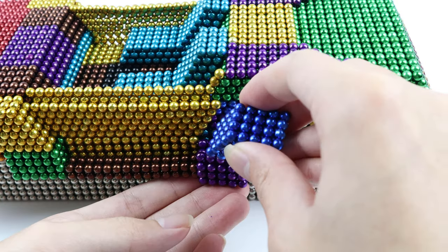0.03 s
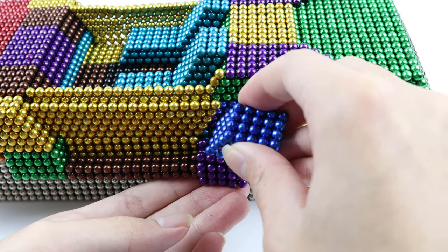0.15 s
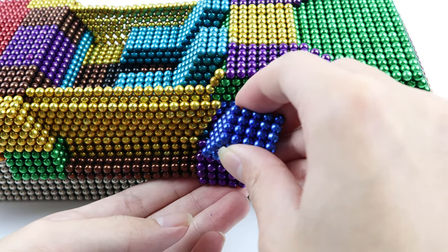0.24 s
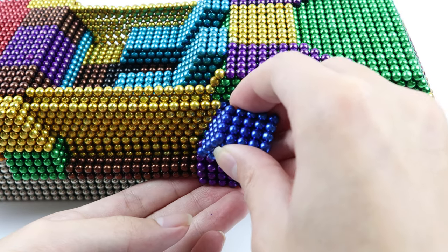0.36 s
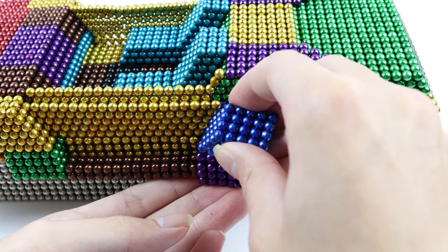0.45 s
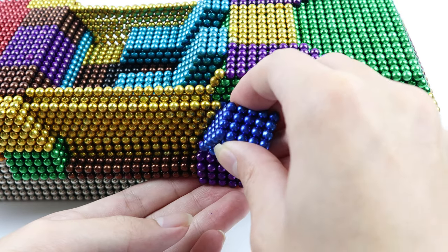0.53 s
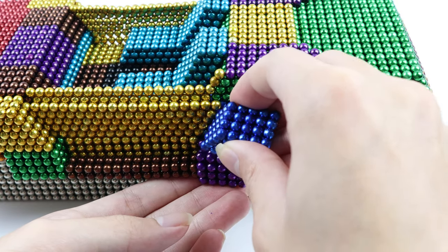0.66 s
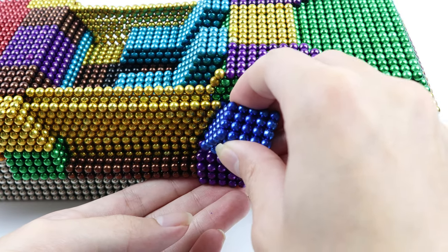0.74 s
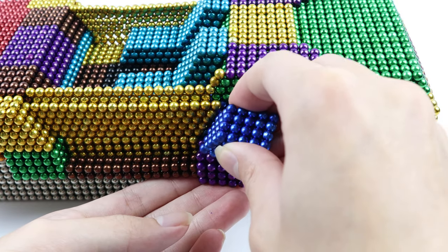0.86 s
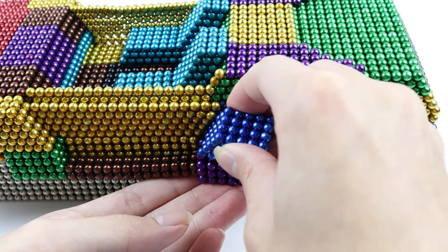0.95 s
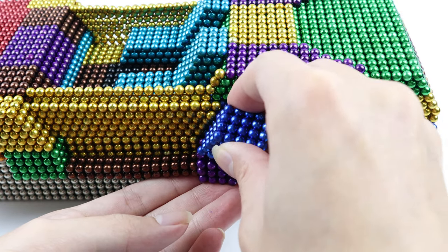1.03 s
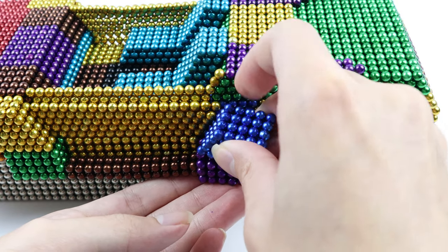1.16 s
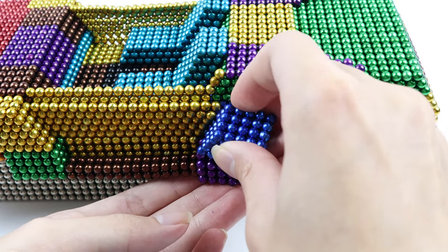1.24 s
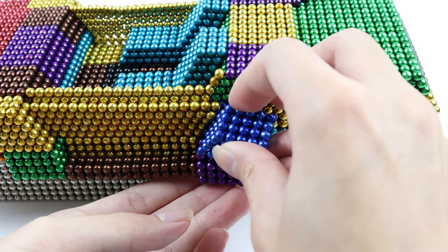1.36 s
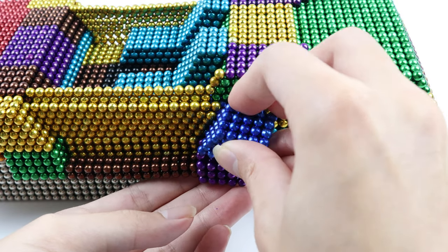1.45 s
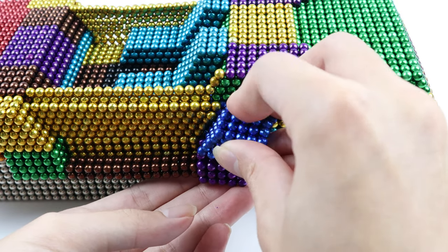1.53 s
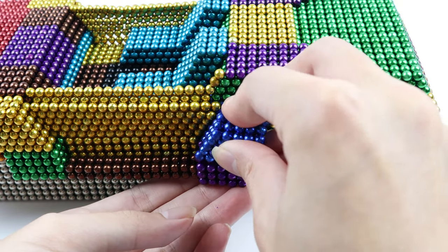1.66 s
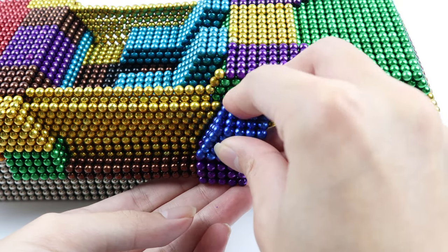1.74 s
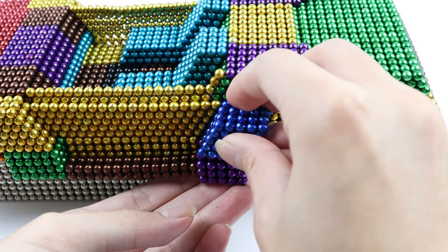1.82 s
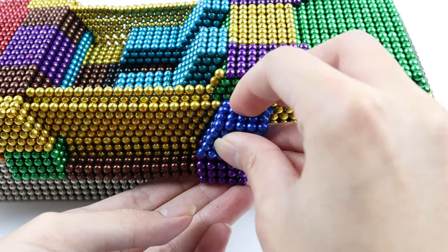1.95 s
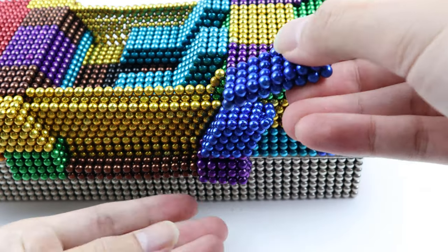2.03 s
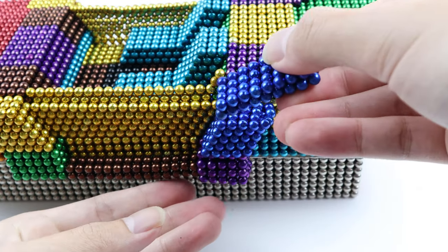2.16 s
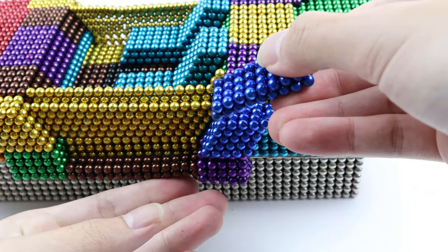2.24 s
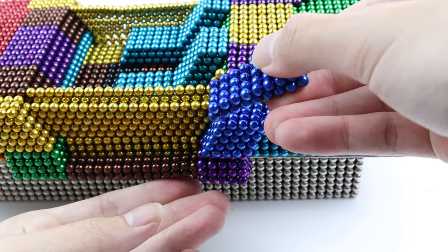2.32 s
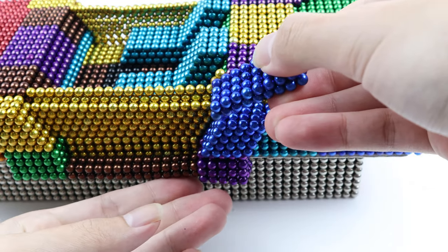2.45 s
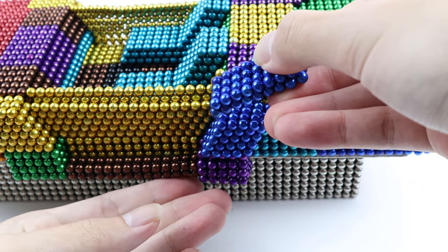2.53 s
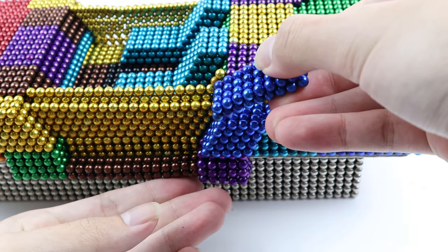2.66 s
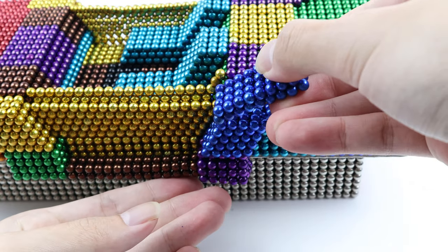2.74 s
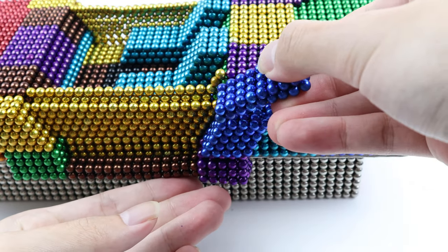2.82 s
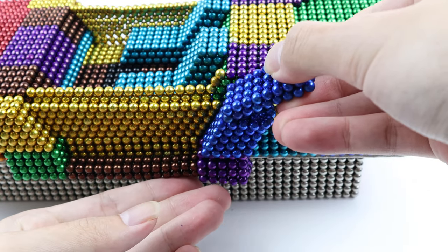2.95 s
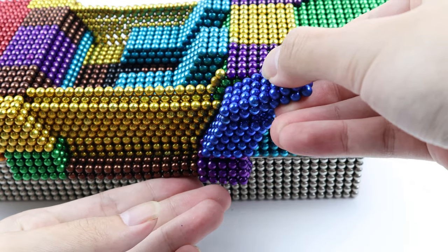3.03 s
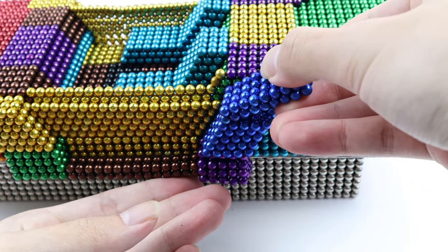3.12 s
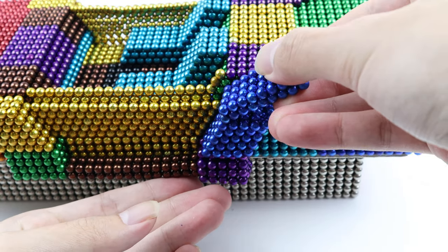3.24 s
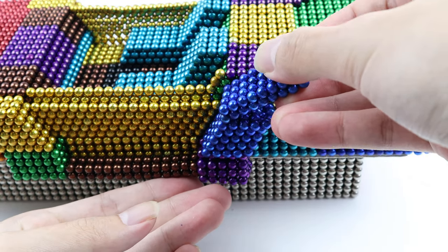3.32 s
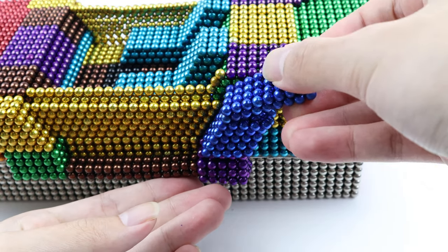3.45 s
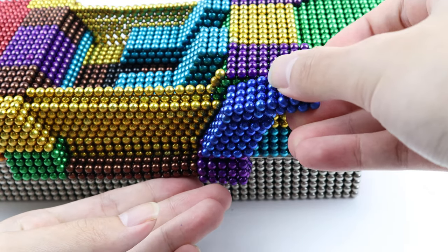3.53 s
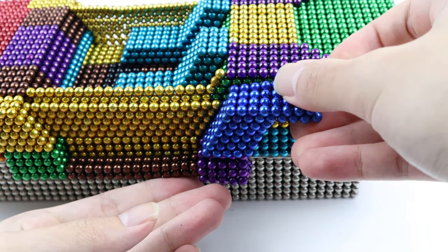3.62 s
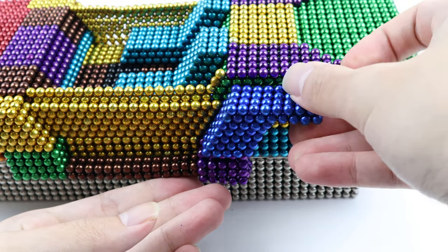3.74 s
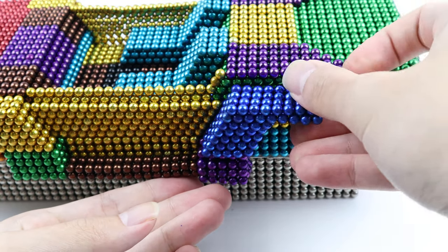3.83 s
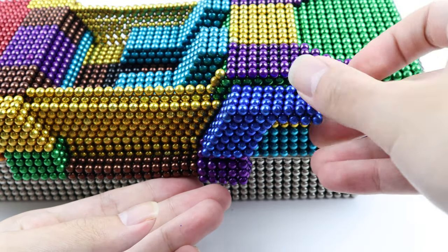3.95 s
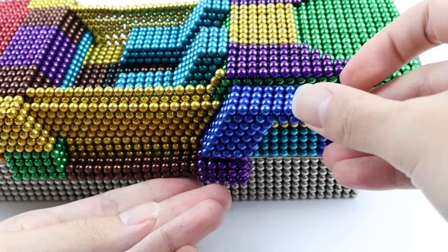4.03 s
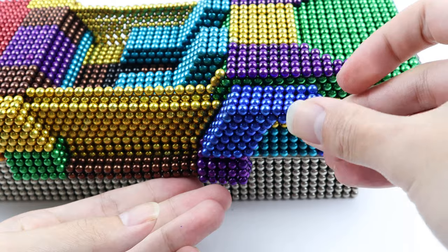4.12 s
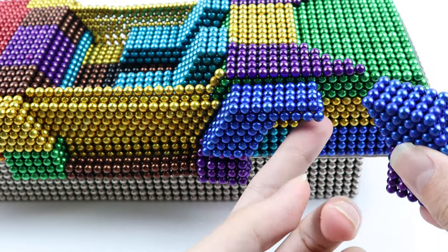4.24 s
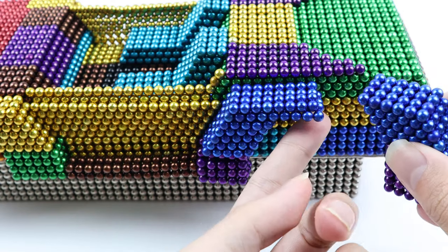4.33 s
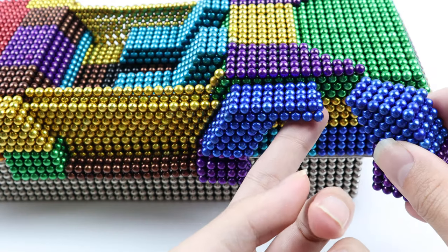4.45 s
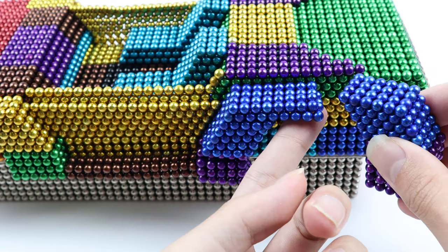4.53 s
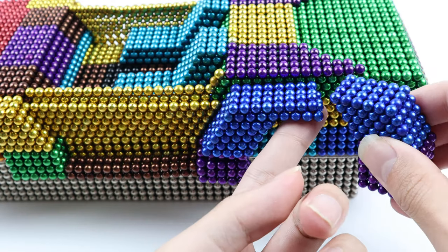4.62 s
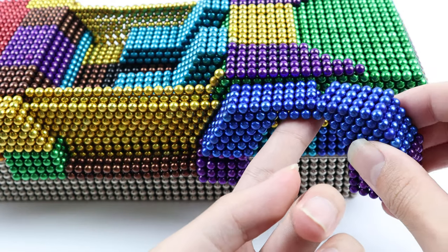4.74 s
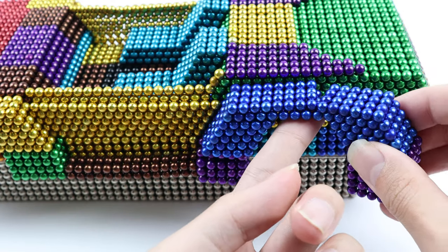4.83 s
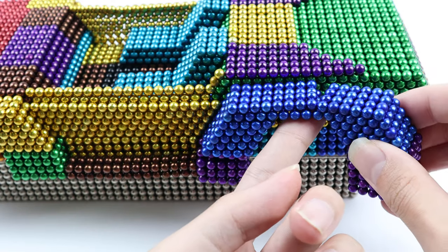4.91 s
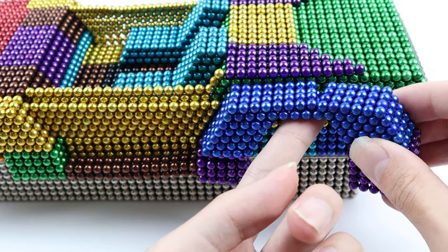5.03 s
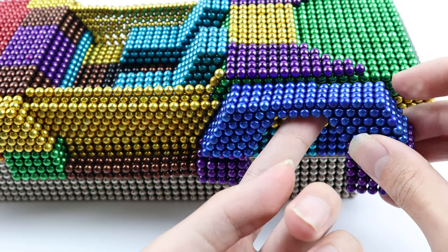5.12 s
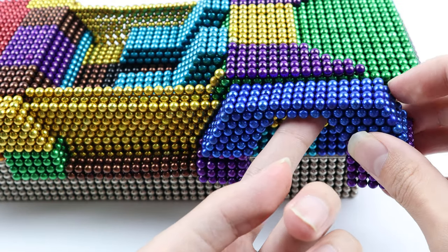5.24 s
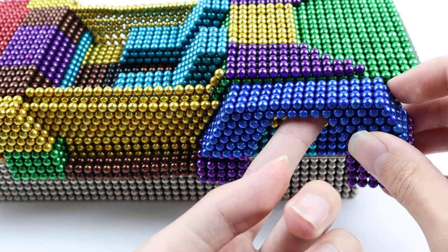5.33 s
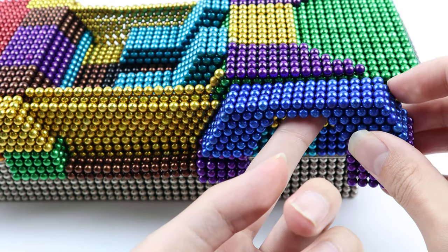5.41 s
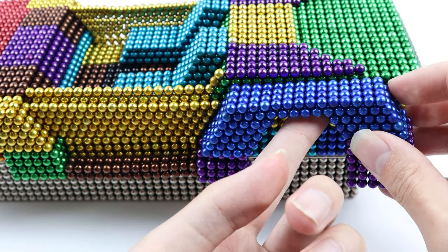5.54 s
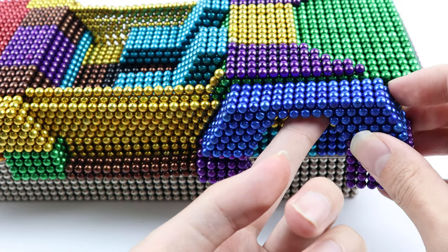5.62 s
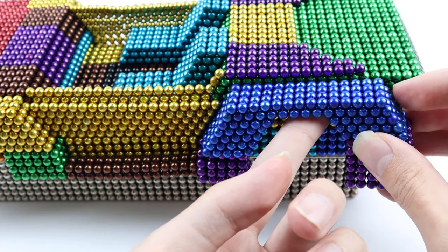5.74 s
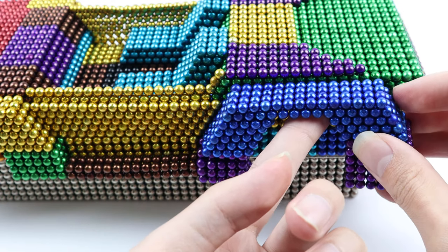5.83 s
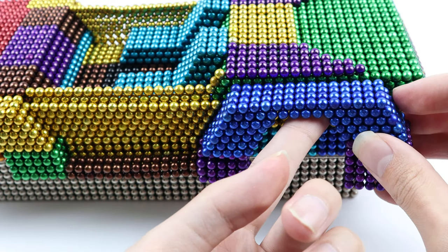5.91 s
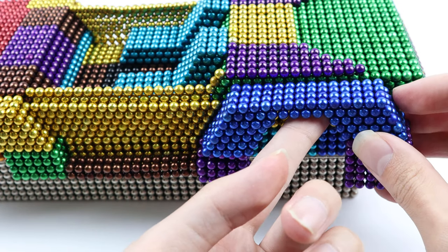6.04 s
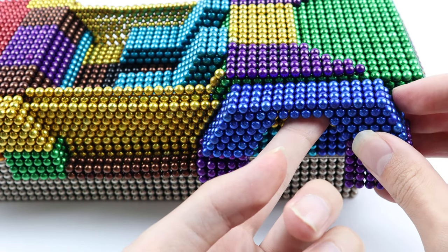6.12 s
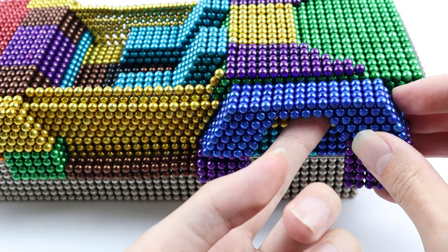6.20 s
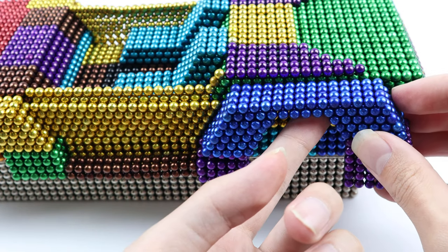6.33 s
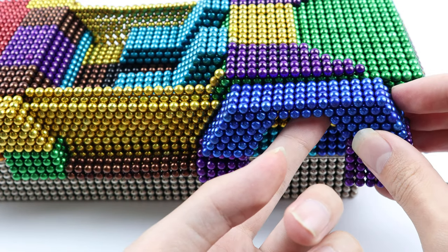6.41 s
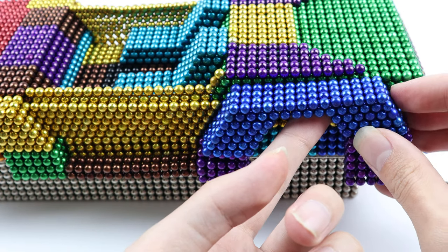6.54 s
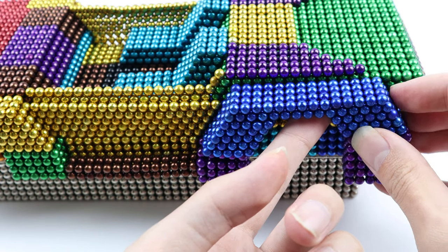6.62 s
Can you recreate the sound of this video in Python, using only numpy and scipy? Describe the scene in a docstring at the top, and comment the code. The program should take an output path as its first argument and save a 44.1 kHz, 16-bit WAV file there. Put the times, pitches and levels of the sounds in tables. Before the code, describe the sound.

Small steel magnetic balls snap together in sharp, bright clicks with tiny rattles and soft low thumps, close up in a quiet room.

```python
"""Magnetic balls snapping onto a model

Panels of small magnetic balls are pressed onto a large ball model on a table in a small room.
Each snap is a run of steel contacts made from filtered noise bursts with a sharp tick; decaying
sines ring the panel and thump the model and table. Between the snaps come a dull rub (swelling
noise bands) and faint thin squeals (wavering, gliding sines), over steady room noise."""
import sys
import numpy as np
from scipy import signal
from scipy.fft import rfft, irfft
from scipy.io import wavfile
from scipy.ndimage import uniform_filter1d

SR = 44100
rng = np.random.default_rng(int(sys.argv[2]) if len(sys.argv) > 2 else 0)


def waveform_to_disk(signal):
    """Save audio, clipped to [-1, 1], as 16-bit WAV at the path in sys.argv[1]."""
    frames = np.transpose(np.atleast_2d(signal))
    scaled = np.clip(frames, -1, 1) * 32767
    samples = np.round(scaled).astype(np.int16)
    wavfile.write(sys.argv[1], SR, samples)


N = 294147
T = np.arange(N) / SR

# spectrum of the room noise: (frequency [Hz], relative density [dB per Hz])
AIR_SPECTRUM = [(12, -51), (20, -19.5), (30, -23.5), (42, -17.5), (54, -2.5), (96, -8), (130, -4),
                (210, -7.5), (241, -11.5), (310, -8), (347, -11.5), (802, -14), (1150, -15), (3740, -22),
                (12100, -40), (16000, -62)]
AIR_DB = -62.5
# width of the diffuse sound field: (frequency [Hz], side minus mid [dB])
FIELD_WIDTH = [(60, -30), (130, -9.5), (300, -4.5), (550, -0.5), (1300, 4), (2500, 4), (5000, 5),
               (15000, 0.5)]

# snaps of a panel onto the model: (time [s], click [dB], tilt [dB per octave], zing of the balls [dB],
# left minus right [dB], following balls relative to the first [dB], panel pitch [Hz], ring [dB],
# upper panel modes [dB], thump [dB], hardness as cut-off [Hz], knock [Hz])
SNAPS = [(.6110, -12.5, -2, 3, 1, -7.5, 2094, -39, 14, -38, 620, 400),
         (0.6997, -30, -2, 5, 0.5, -9.5, 2103, -43, 6, -37, 280, 331),
         (1.0553, -8.5, -2.5, 11.5, -3, -11, 2178, -25.5, -3.5, -29, 553, 457),
         (1.0803, -11.5, 4.5, -1, 5, -6.5, 1880, -29.5, 5, -44, 454, 358),
         (1.7089, -20.5, 3.5, -1, 0.5, -6.5, 1903, -28, -3, -42, 402, 300),
         (1.7295, -9.5, 0, 0.5, 1.5, -0.5, 1878, -22.5, 9.5, -26, 542, 251),
         (1.9180, -29, 4, -1, -0.5, 1.5, 1797, -38, -22, -41.5, 322, 290.4),
         (3.1372, -10.5, -2.5, 5, -0.5, -7.5, 1926, -33, 7.5, -29.5, 238, 313.4),
         (3.7793, -34.5, 5, 0, 0, 8.5, 1900, -67, -1, -40, 230, 174),
         (3.8556, -39, 4.5, 4.5, -4.5, 1.5, 1898, -44.5, -13.5, -41.5, 398.4, 297.7),
         (4.9054, -15, 3, -3.5, -2.5, -13, 1906, -61, -2.5, -35.5, 332.3, 325),
         (5.2530, -20.5, 5, 0, -1.5, 4, 2120, -43, 6, -30.5, 230, 301),
         (5.3030, -17, 7, -1.5, 0, -3.5, 2070, -62, 2.5, -30, 159, 203.6)]
# single balls that jump into place: (time [s], level [dB], tilt [dB per octave])
TICKS = [(1.489, -66.5, -0.5), (1.7275, -15.5, -3.5), (3.1351, -22, -2), (4.9152, -26, 3.5),
         (5.2732, -20, 2)]
# spectrum of a steel contact: (frequency [Hz], level [dB])
STEEL_SPECTRUM = [(80, -77.5), (400, -48), (700, -34.5), (1400, -29.5), (2200, -13.5), (3000, -13),
                  (3800, -9.5), (4700, -7.5), (5600, -5.5), (7000, -6), (9500, -3.5), (11700, -1.5),
                  (13200, -6), (15000, -19), (16500, -36.5)]
# after the first contact the next balls of the row close one by one, each weaker
RUN_GAP_S, RUN_FALL_DB = 0.0019, 6

# bending modes of the panel: (multiple of the main pitch [1], level [dB], t60 [s])
PANEL_MODES = [(0.519, -13, 0.033), (.63, -6, 0.035), (.82, -3, 0.024), (1, 9.5, 0.022),
               (1.13, -8.5, 0.024), (1.4, 0, .014), (1.62, -12.5, .012)]
# the panel and the heavy model answer a little after the first contact
FLEX_LAG_S, THUMP_LAG_S = 0.0011, 0.003

# spectra of the two parts of the room tail: (frequency [Hz], level [dB])
ROOM_BODY = [(1000, 10.0), (3000, 1.0), (8000, -3.0), (11000, -11.0), (16000, -46.0)]
ROOM_TREBLE = [(6000, -32), (9000, -6.5), (11500, -6.0), (14000, -5.5), (16000, -1)]

# modes of model and table: (frequency [Hz], level [dB], t60 [s])
TABLE_MODES = [(96, -20.5, 0.64), (115.9, -13.5, 0.45), (121.04, -6, 0.81), (143.5, -10, 0.61),
               (169.9, -3, 0.22), (192.5, -1, 0.3), (235.7, -12.5, 0.4), (261.2, -2.5, 0.16),
               (301.4, -1.5, 0.2), (331.2, -1, 0.11), (378, -8.5, 0.27), (434, -15.5, 0.2)]
# the model rocks back once after the heaviest snap
ROCK_S, ROCK_DB, ROCK_HZ = 1.811, -34, 153

# faint thin squeals: (start [s], length [s], pitch [Hz], glide [Hz per s], level [dB])
SQUEALS = [(1.406, 0.14, 1170, -200, -47.5), (2.074, 0.12, 2270, -62, -62.5), (2.06, 0.17, 4076, 2, -67.5),
           (4.19, 0.067, 2240, -3, -69), (4.314, 0.164, 2010, -180, -51.5), (4.475, 0.18, 1714, 202, -56.5),
           (4.52, 0.089, 3010, -4, -65.5), (4.532, 0.27, 1189, 99, -49), (5.013, 0.055, 2025, -100, -66),
           (5.204, 0.056, 1286, -8, -57.5)]
SQUEAL_RISE_S, SQUEAL_T60_S = 0.061, 0.62

# fingers rub over the balls: (start [s], rise [s], hold [s], level [dB])
RUBS = [(1.41, 0.14, 0.011, -37.5)]
# resonances of the rub: (centre [Hz], width [Hz], level [dB])
RUB_MODES = [(382, 188.4, -6), (684, 56, -21.5), (1040, 120, -1.5), (1200, 110, -8), (1562, 158, -14.5),
             (1990, 320, -19)]
# soft low shuffles as the hands change grip: (start [s], rise [s], hold [s], level [dB])
SHUFFLES = [(4.265, 0.045, 0.12, -51.5), (5.06, .1, 0.21, -57.5)]
# faint rustle as the last panel is pushed home: (start [s], rise [s], hold [s], level [dB])
RUSTLES = [(5.0, 0.13, 0.17, -58.5)]
# thin hiss of fingertips sliding on the balls: (start [s], rise [s], hold [s], level [dB])
SLIDES = [(2.05, 0.046, 0.11, -65), (2.70, .08, 0.091, -75), (3.60, 0.043, .06, -72.5),
          (3.94, 0.043, 0.074, -70.5)]
HAND_RELEASE_T60_S = 0.35

TOP_HZ = 16600


def undb(db):
    """Logarithmic level: decibels to amplitude gain."""
    return 10 ** (np.asarray(db) / 20)


def unit(x):
    """Normalisation: scale to rms 1."""
    return x / np.sqrt(np.mean(x ** 2))


def fade(t, t60):
    """Exponential damping: a decay by 60 dB in t60 seconds."""
    return np.exp(-np.log(1000) * t / t60)


def freqs(size):
    """Fourier analysis: the bin frequencies [Hz] of a sound of this many samples, at least 1 Hz."""
    return np.maximum(np.fft.rfftfreq(size, 1 / SR), 1)


def shape(points, hz):
    """Spectral envelope: gain at hz, with levels interpolated over log frequency."""
    f, db = np.transpose(points)
    return undb(np.interp(np.log(hz), np.log(f), db))


def resonance(hz, centre_hz, width_hz):
    """Resonance curve: gain 1 at the centre, width taken at half gain."""
    detuning = (hz ** 2 - centre_hz ** 2) / (hz * width_hz)
    return 1 / (1 + detuning ** 2)


def swell(s, rise_s, hold_s, db, t60):
    """Amplitude envelope: linear rise from s, steady hold at db, exponential release."""
    rise = np.clip((T - s) / rise_s, 0, 1)
    release = fade(np.maximum(T - s - rise_s - hold_s, 0), t60)
    return undb(db) * rise * release


def diffuse(gain, size=N):
    """Diffuse field: rms-1 stereo noise of this spectrum, alike in the bass and wide in the treble."""
    mid, side = rfft(rng.standard_normal((2, size))) * gain
    wide = shape(FIELD_WIDTH, freqs(size))
    left_right = np.array([mid + wide * side, mid - wide * side]) / np.sqrt(1 + wide ** 2)
    return unit(irfft(left_right, size))


def add(out, s, sound):
    """Superposition: mix a sound in at time s."""
    i = int(s * SR)
    out[:, i:i + sound.shape[-1]] += sound[..., :N - i]


def air():
    """Stationary noise: a steady random field fills the room."""
    return undb(AIR_DB) * diffuse(shape(AIR_SPECTRUM, freqs(N)))


def ripple(ripple_db=2.5, ripple_hz=320, size=2048):
    """Modal irregularity: a new random set of uneven resonances for each struck cluster of balls."""
    knots = np.arange(0, SR / 2, ripple_hz)
    levels = rng.standard_normal(len(knots))
    return undb(ripple_db * np.interp(freqs(size), knots, levels))


def minimum_phase(gain, size):
    """Causality: the cepstrum folded to positive time lets nothing sound ahead of the hit."""
    cepstrum = irfft(np.log(gain))[:size // 2]
    cepstrum[1:] *= 2
    return np.exp(rfft(cepstrum, size))


def contact(cluster, tilt_db, zing_db, scatter_db, tilt_from_hz=2200, tick=0.6,
            rattle_t60=0.0035, scatter_t60=0.019, gap_s=0.0024, size=2048):
    """Impact and scattering: a tick rattles through neighbouring balls, then scatters over the model."""
    hz, t = freqs(size), T[:size]
    # the tick reaches the left channel two samples sooner
    first = unit(np.array([t == T[0], t == T[2]], float))
    rattle = unit(diffuse(1, size) * fade(t, rattle_t60))
    build = np.minimum(t / gap_s, 1) ** 2
    scatter = unit(diffuse(1, size) * fade(t, scatter_t60) * build)
    tilt = tilt_db * np.log2(np.maximum(hz, tilt_from_hz) / 10000)
    zing = zing_db * resonance(hz, 12000, 3500)
    colour = cluster * shape(STEEL_SPECTRUM, hz) * undb(tilt + zing)
    source = tick * first + rattle + undb(scatter_db) * scatter
    click = irfft(rfft(source) * minimum_phase(colour, size))
    # its energy is that of one millisecond at rms 1
    return unit(click) * np.sqrt(SR / 1000 / size)


def clicks(first_scatter_db=-8, run_scatter_db=-1.0, run_tilt_db=-2.5,
           tick_zing_db=3, tick_scatter_db=2.0, count=3):
    """Successive impacts: a sharp contact starts a duller run of further balls; single balls tick too."""
    out = np.zeros((2, N))
    for s, db, tilt_db, zing_db, pan_db, run_db, *_ in SNAPS:
        gain = undb(db + np.array([[pan_db], [-pan_db]]) / 2)
        cluster = ripple()
        add(out, s, gain * contact(cluster, tilt_db, zing_db, first_scatter_db))
        for k in range(count):
            lag = RUN_GAP_S * (k + 1 + rng.uniform(-0.2, 0.2))
            follower = contact(cluster, tilt_db + run_tilt_db, zing_db, run_scatter_db)
            add(out, s + lag, gain * undb(run_db - k * RUN_FALL_DB) * follower)
    for s, db, tilt_db in TICKS:
        add(out, s, undb(db) * contact(ripple(), tilt_db, tick_zing_db, tick_scatter_db))
    return out


def flexes(rise_s=0.0023):
    """Bending vibration: each snap jerks the loose panel, whose damped modes ring briefly."""
    out, t = np.zeros((2, N)), T[:SR // 10]
    # higher modes reach the two channels further out of step
    apart = np.array([[0], [1]])
    for s, *_, hz, db, upper_db, _, _, _ in SNAPS:
        ring = 0
        for ratio, mode_db, t60 in PANEL_MODES:
            gain = undb(mode_db + upper_db * (ratio > 1))
            wave = np.sin(2 * np.pi * hz * ratio * t - apart * ratio ** 2)
            ring = ring + gain * fade(t, t60) * wave
        add(out, s + FLEX_LAG_S, undb(db) * ring * np.minimum(t / rise_s, 1))
    return out


def room(x, wet_db=-10, t60=0.3, treble_t60=0.32, build_s=0.013):
    """Reverberation: the walls add a short diffuse tail whose body and treble decay separately."""
    size = SR // 2
    t, hz = T[:size], freqs(size)
    body = diffuse(shape(ROOM_BODY, hz), size) * fade(t, t60)
    treble = diffuse(shape(ROOM_TREBLE, hz), size) * fade(t, treble_t60)
    tail = (body + undb(-3) * treble) * np.minimum(t / build_s, 1)
    response = undb(wet_db) * unit(tail) / np.sqrt(size)
    return x + signal.fftconvolve(x, response, axes=1)[:, :N]


def thump(db, hard_hz, knock_hz, rise_s=0.0043, knock_db=-1.5, knock_t60=0.15, boom_db=-15,
          boom_t60=0.61, clack_db=-9, clack_t60=0.3, upper_clack_db=2, upper_from_db=-28, lean=0.26):
    """Modal excitation: wall knocks, model rocks, room booms; softer blows drive the high modes less."""
    t, hz = T[:SR], freqs(SR)
    body = 0
    for f, mode_db, t60 in TABLE_MODES:
        drive = (f / hard_hz) ** lean / np.hypot(1, (f / hard_hz) ** 3)
        body = body + undb(mode_db) * drive * fade(t, t60) * np.sin(2 * np.pi * f * t)
    knock = fade(t, knock_t60) * np.sin(2 * np.pi * knock_hz * t)
    boom_spectrum = resonance(hz, 220, 370) / np.hypot(1, (hz / hard_hz) ** 2)
    boom = diffuse(boom_spectrum, SR) * fade(t, boom_t60)
    # hard blows wake the crowded higher modes; heavy ones favour the highest of them
    upper = undb(upper_clack_db + db - upper_from_db) * resonance(hz, 1150, 110)
    clack = diffuse(resonance(hz, 540, 240) + upper, SR) * fade(t, clack_t60)
    clack = clack / np.hypot(1, (540 / hard_hz) ** 4)
    blow = body + undb(knock_db) * knock + undb(boom_db) * boom + undb(clack_db) * clack
    return undb(db) * (1 - np.exp(-t / rise_s)) * blow


def thumps():
    """Momentum transfer: the model takes the blow of every snap, and once rocks back."""
    out = np.zeros((2, N))
    for s, *_, db, hard_hz, knock_hz in SNAPS:
        add(out, s + THUMP_LAG_S, thump(db, hard_hz, knock_hz))
    add(out, ROCK_S, thump(ROCK_DB, ROCK_HZ, ROCK_HZ))
    return out


def squeals(waver_hz=28, rough=3):
    """Random modulation: gliding tones waver in phase and, less, strength; the higher, the more blurred."""
    out = np.zeros((2, N))
    for s, length_s, hz, glide, db in SQUEALS:
        pitch = hz + glide * np.clip(T - s, 0, length_s)
        phase = 2 * np.pi * np.cumsum(pitch) / SR
        # slow noise, separate on each side; waver_hz holds for a pitch of 1500 Hz
        blur = 1 / (1 + (freqs(N) / (waver_hz * hz / 1500)) ** 2)
        a, b = rough * unit(irfft(rfft(rng.standard_normal((2, 2, N))) * blur, N))
        tone = (1 + a) * np.sin(phase) + b * np.cos(phase)
        # the square root halves the level swings in decibels
        tone = tone / np.sqrt(np.hypot(1 + a, b))
        envelope = swell(s, SQUEAL_RISE_S, length_s - SQUEAL_RISE_S, db, SQUEAL_T60_S)
        out += envelope * unit(tone)
    return out


def strokes(rows):
    """Superposed envelopes: the swells of all hand movements in a table."""
    return sum(swell(*row, HAND_RELEASE_T60_S) for row in rows)


def handling(grain_db=2, slide_hz=3750, slide_width_hz=900):
    """Friction noise: uneven grip modulates a dull rub, low shuffles, a rustle and sliding fingertips."""
    hz = freqs(N)
    grip = undb(grain_db * unit(uniform_filter1d(rng.standard_normal(N), SR // 80)))
    rub_spectrum = sum(undb(db) * resonance(hz, f, width) for f, width, db in RUB_MODES)
    shuffle_spectrum = resonance(hz, 169, 120) + undb(-26.5) * resonance(hz, 750, 460)
    rustle_spectrum = resonance(hz, 1226, 430) + undb(-16) * resonance(hz, 1930, 400)
    rub = diffuse(rub_spectrum) * strokes(RUBS)
    shuffle = diffuse(shuffle_spectrum) * strokes(SHUFFLES)
    rustle = diffuse(rustle_spectrum) * strokes(RUSTLES)
    slide = diffuse(resonance(hz, slide_hz, slide_width_hz)) * strokes(SLIDES)
    return grip * (rub + shuffle + rustle + slide)


def scene():
    """Superposition: reverberant snaps, thumps, squeals and handling over steady room noise."""
    snaps = room(clicks() + flexes())
    return air() + snaps + thumps() + squeals() + handling()


def record(dry, ceiling=0.99):
    """Saturation and band limiting: the sharpest peaks are rounded, then the top is cut."""
    rounded = ceiling * np.tanh(dry / ceiling)
    low_pass = signal.ellip(8, 0.2, 70, TOP_HZ, fs=SR, output="sos")
    return signal.sosfilt(low_pass, rounded)


dry = scene()
out = record(dry)
waveform_to_disk(out)
```